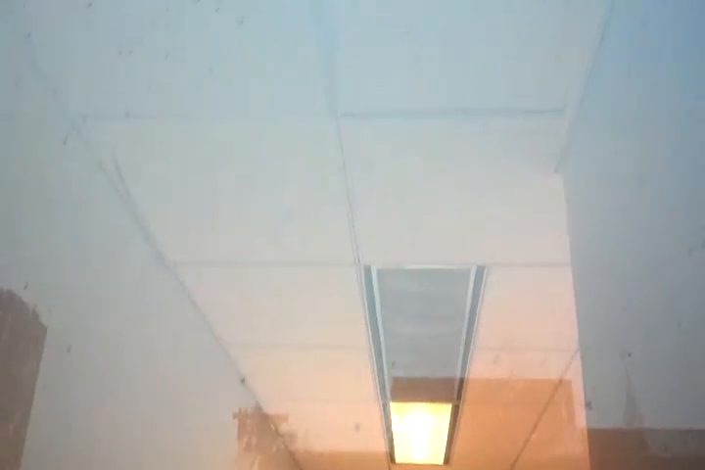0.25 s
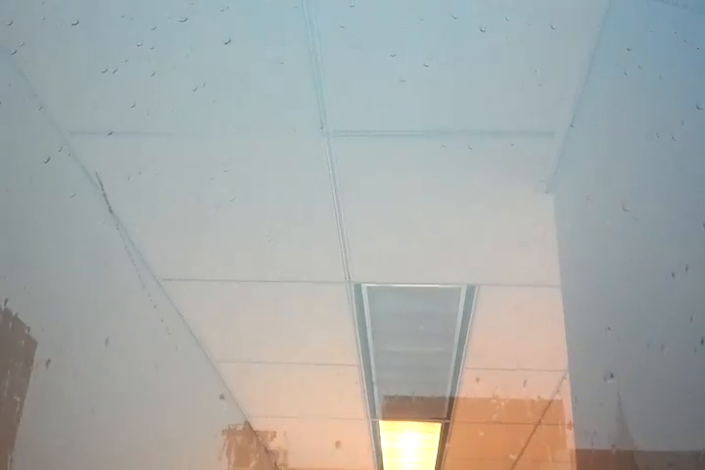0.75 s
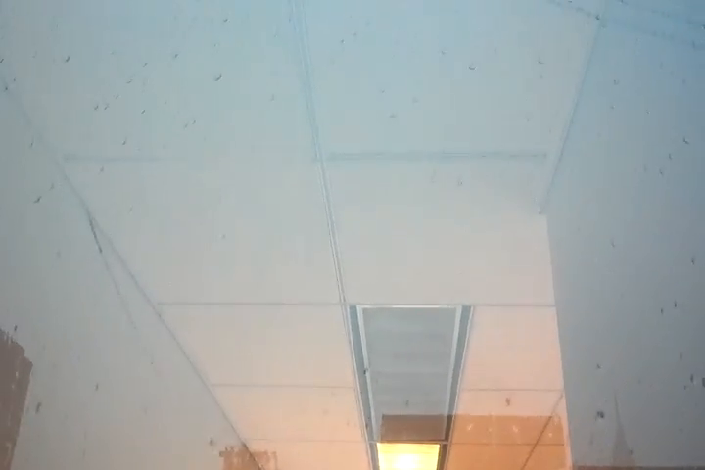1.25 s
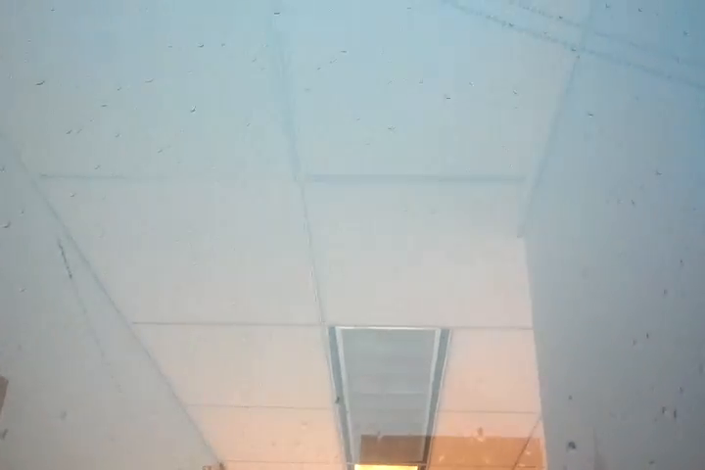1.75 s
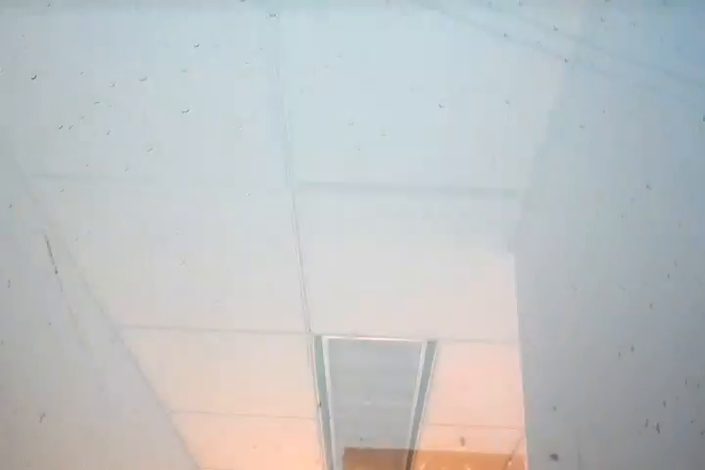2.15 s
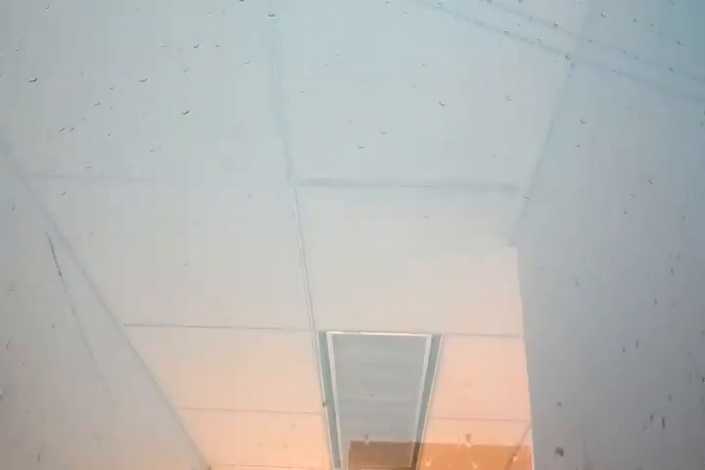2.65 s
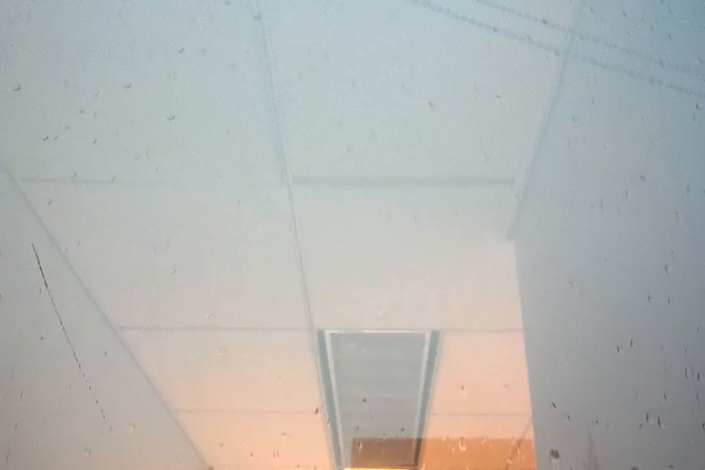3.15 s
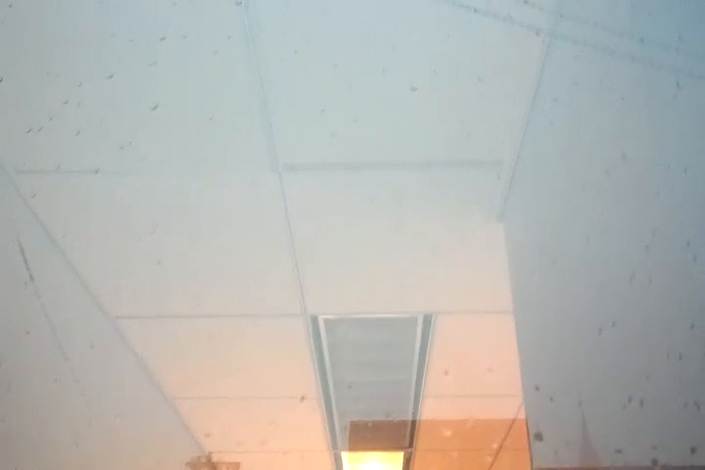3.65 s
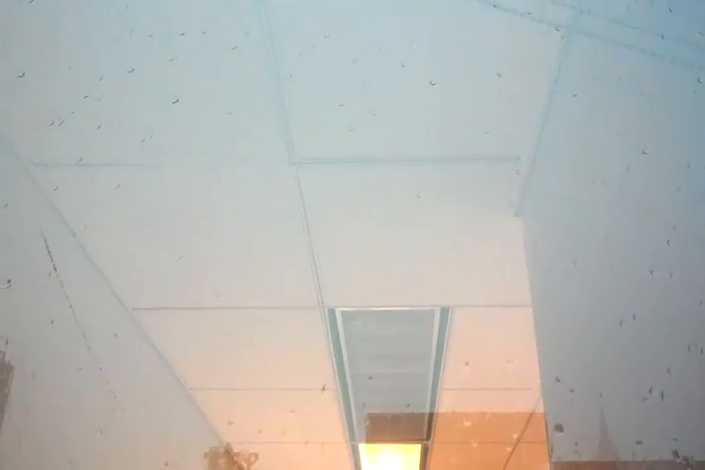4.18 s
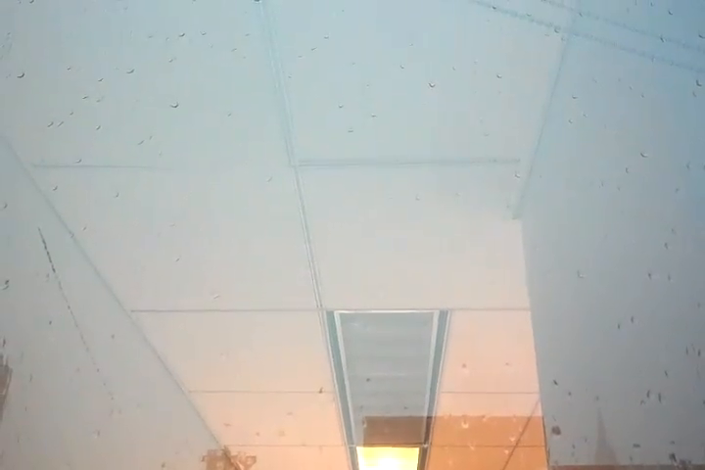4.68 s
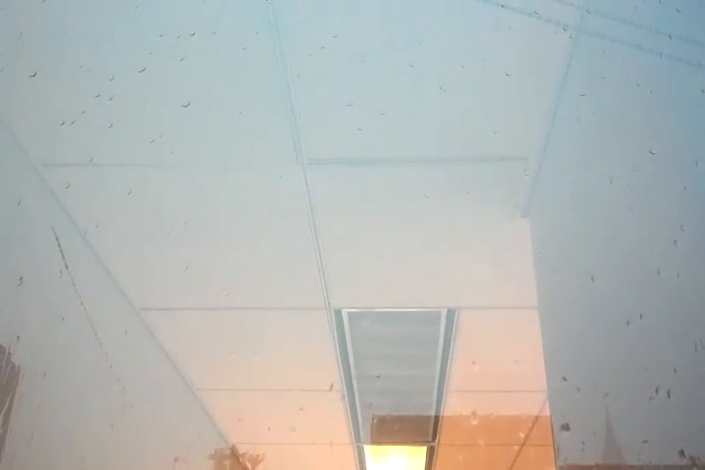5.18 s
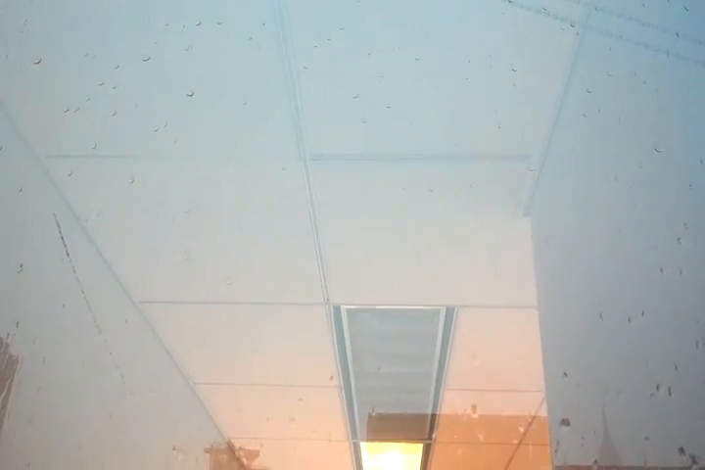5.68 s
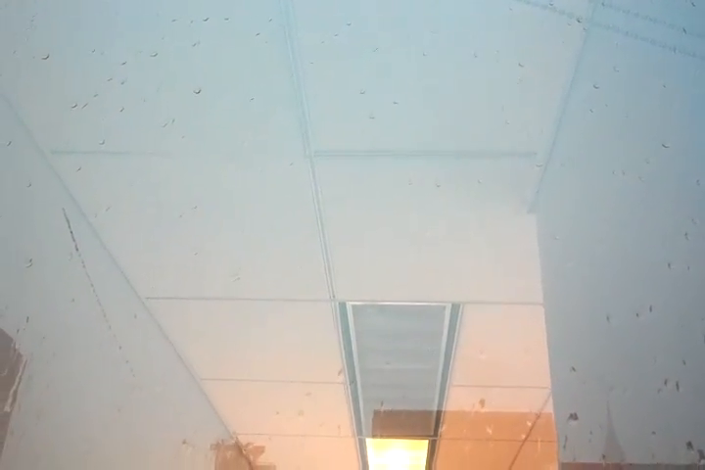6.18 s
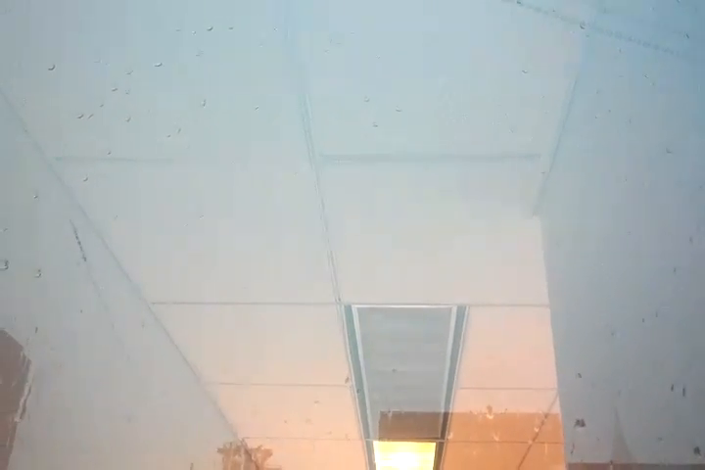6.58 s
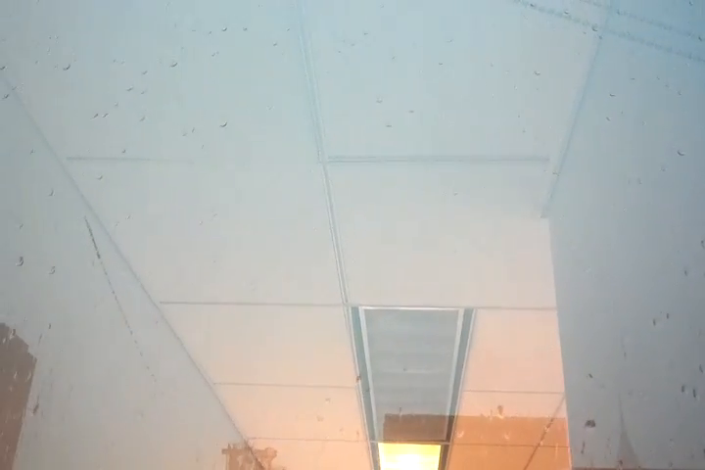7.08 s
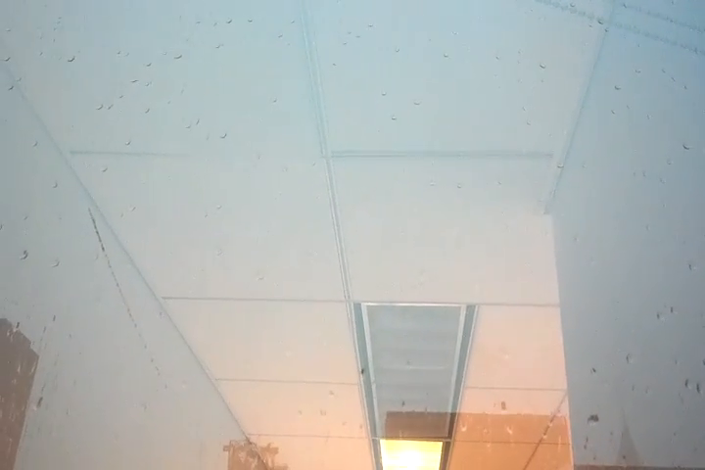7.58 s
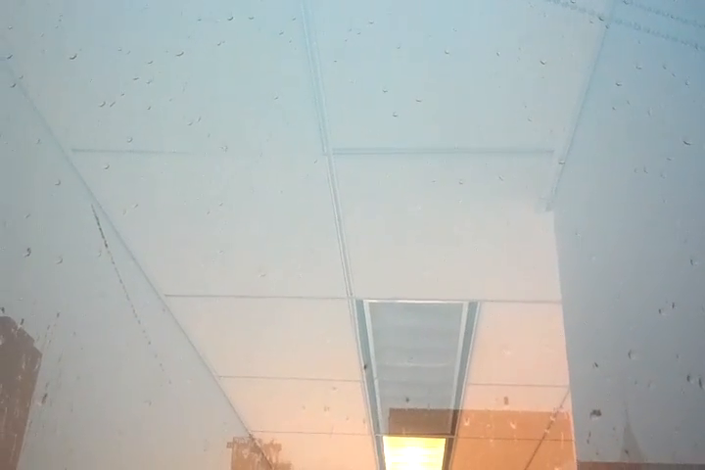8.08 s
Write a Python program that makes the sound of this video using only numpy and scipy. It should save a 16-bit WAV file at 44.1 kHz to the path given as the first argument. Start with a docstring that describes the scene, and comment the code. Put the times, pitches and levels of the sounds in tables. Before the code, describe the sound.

Indoors behind a closed window, a heavy downpour rushes without pause over a low rumble that booms in the pane. A sharp pop near the start suddenly drops the level, and the storm swells back over nearly three seconds. Fat drops tap and fine drops tick on glass and sill. Wide stereo, with the low boom leaning right.

```python
"""Indoors at night behind a closed window: a downpour rushes steadily over a low rumble that booms in the pane.
Filtered noise makes the rush, hiss and rumble; fat drops and fine patter are noise bursts ringing glass and sill.
Gusts and deep surges swell the storm. Two microphone ports are combined into a wide stereo pair.
A sharp pop near the start slams the gain control down; the storm takes nearly three seconds to swell back."""
import sys
import numpy as np
from scipy import signal
from scipy.fft import rfft, irfft, next_fast_len
from scipy.io import wavfile
from scipy.ndimage import uniform_filter1d

SR = 44100
rng = np.random.default_rng(int(sys.argv[2]) if len(sys.argv) > 2 else 0)


def dump(signal):
    """Clip the signal to [-1, 1] and save it as 16-bit WAV at the path in sys.argv[1]."""
    limited = np.clip(np.atleast_2d(signal).T, -1, 1)
    pcm = np.round(limited * 32767).astype(np.int16)
    wavfile.write(sys.argv[1], SR, pcm)


N = 367284

# Storm roar spectrum. Each row: frequency in Hz, density in dB per Hz before the level settings.
ROAR_SPECTRUM = [(20, -37), (45, -86), (70, -53.5), (100, -51), (145, -58.5), (250, -61), (400, -70.5),
                 (1000, -100), (4000, -130)]
# Bending modes of the pane. Each row: centre in Hz, width of one filter pass in Hz (two are used), relative level in dB.
PANE_MODES = [(109, 6, 5), (132, 12, -1), (183, 22, 2.5), (195, 34, 3), (272, 20, -8), (326, 16, -5),
              (350, 16, -5), (464, 18, -7), (515, 18, -14.5), (622, 24, -9.5), (645, 26, -12),
              (708, 26, -14.5), (803, 32, -12.5), (928, 36, -16.5), (1165, 80, -20.5), (1527, 30, -19),
              (1792, 60, -19), (1991, 20, -13.5)]
# Gusts. Each row: peak in seconds, release in seconds, rise of the rumble in dB, rise of the rush in dB.
GUST_EVENTS = [(0.05, 0.08, 4, 6), (1.93, 0.63, 6, 1.4), (3.0, 0.41, 2.8, 1.6), (4.351, 0.4, -2, 1.7),
               (5.85, 0.26, 0.5, 0.9), (6.45, 0.99, 0, 0.67), (7.95, 0.18, -1.5, 1.7)]
# Deep surges. Each row: middle in seconds, half length in seconds, density in dB per Hz ahead of the band filter.
SURGE_EVENTS = [(2.05, 0.14, -45.5), (5.054, 0.33, -51.5), (6.537, 0.19, -46), (7.38, 0.29, -47.5)]
# Rain behind the glass. Each row: frequency in Hz, density in dB per Hz before the swell.
RUSH_SPECTRUM = [(60, -94), (200, -61), (400, -74.5), (700, -76), (1000, -79), (1400, -80), (2000, -77.5),
                 (2350, -78), (2650, -81), (3100, -81), (3600, -86), (4400, -91.5), (7700, -99),
                 (16000, -108)]
# Even hiss on top. Each row: frequency in Hz, density in dB per Hz before the swell.
HISS_SPECTRUM = [(1000, -95), (4300, -90), (5100, -86.8), (6000, -86), (6900, -89), (7700, -90),
                 (9000, -89), (11000, -90), (13400, -85), (14200, -85.5), (15300, -80.5)]
# Modes a drop rings in glass and sill. Each row: centre in Hz, width in Hz, relative level in dB.
DROP_MODES = [(1160, 240, -7), (1530, 160, -4), (1780, 100, 2), (1991, 36, 6), (2220, 160, 2),
              (2400, 160, -1), (2650, 110, 0), (2850, 130, 1), (3080, 220, 2.5), (3520, 450, -3),
              (4180, 450, -5.5), (8000, 8000, -22)]
# Fat drops on the window. Each row: start in seconds, level in dB per Hz before the mode levels, brightness in dB.
FAT_DROPS = [(0.68, -83, 1), (0.77, -72.5, -1), (0.921, -75, 1.5), (1.014, -78, 4), (1.067, -74, -5),
             (1.097, -73, -15), (1.305, -67.5, -6), (1.369, -67, -11), (1.402, -68, -9), (1.642, -81, 4),
             (1.677, -80, -3), (1.761, -68.5, -4.5), (1.848, -69, -5), (1.928, -65.5, -1.5),
             (1.976, -82, 5), (2.087, -64.5, -4), (2.368, -68, -7.5), (2.484, -73, -6), (2.762, -74.5, -7),
             (2.809, -69.5, -21), (2.904, -68, -3), (3.006, -71, 1), (3.098, -69.5, -16), (3.23, -75, -6),
             (3.247, -69, -18), (3.284, -76, -7), (3.612, -74.5, -8), (3.656, -71, -6), (3.758, -72, -8),
             (3.839, -77, 0), (4.056, -74.5, 2), (4.125, -69, -18), (4.344, -64, -15), (4.589, -72, -3),
             (4.644, -78.5, 0), (5.508, -67.5, -6), (5.58, -70, -7), (5.614, -68, -6), (5.643, -70, -8),
             (5.832, -84, 4), (5.869, -65, -33), (5.978, -65.5, -14), (6.323, -72, -10), (6.341, -73, 5),
             (6.391, -71, -5), (6.464, -69, 1), (6.592, -75, -0.5), (6.638, -82, 1), (6.745, -73, -14),
             (6.953, -72, -20), (7.761, -79, 2), (7.863, -75, 0), (7.99, -66.5, -1), (8.181, -69, -7),
             (8.224, -68, -10)]
# Colour of the left port against the right. Each row: frequency in Hz, level difference in dB.
PORT_DIFFERENCE = [(200, -1.2), (600, -1.2), (1300, -3), (2000, -5), (3200, 0), (5000, 2), (7000, 0),
                   (10500, 0), (12500, -6), (16000, -6)]

GUST_ATTACK_S = 0.17
RUMBLE_DB, RUMBLE_EASING_DB_PER_S = -1.43, 0.34
RUMBLE_WAVER_DB, PANE_WAVER_DB = 0.07, 1.8  # wind
RUSH_DB = -1.5  # between gusts
SURGE_HZ, SURGE_PASS_WIDTH_HZ = 103, 41
DROP_ATTACK_S, SPOT_SCATTER_DB = 0.002, 1.6
SPRAY_S, SPRAY_DB_PER_HZ, SPRAY_DECAY_S = 2.087, -78.5, 0.022
SPRAY_HZ, SPRAY_WIDTH_HZ = 10400, 8700
POP_S, POP_DB, POP_DECAY_S = 0.1603, 21.2, 0.00045
PORT_LAG_SAMPLES = 16
TOP_HZ = 15760

SIZE = next_fast_len(N + 8192)  # padded FFT length
HZ = np.maximum(np.arange(SIZE // 2 + 1) * SR / SIZE, 1)
T = np.arange(N) / SR


def undb(db):
    """Decibels to gain."""
    return 10 ** (np.asarray(db) / 20)


def noise():
    """Two unrelated white noises at 0 dB per Hz."""
    return rng.standard_normal((2, N)) * np.sqrt(SR / 2)


def filtered(x, response):
    """Apply a frequency response."""
    return irfft(rfft(x, SIZE) * response, SIZE)[..., :N]


def colour(points):
    """Response through (Hz, dB) points, straight lines over log frequency."""
    hz, db = np.transpose(points)
    return undb(np.interp(np.log(HZ), np.log(hz), db))


def resonance(hz, width_hz):
    """Response of one damped mode, gain 1 at its centre."""
    return 1 / (1 + 1j * (HZ / hz - hz / HZ) * hz / width_hz)


def walk(rate_hz):
    """Random levels held 1 / rate_hz and smoothed twice; spread near 1."""
    hold = int(SR / rate_hz)
    held = np.repeat(rng.standard_normal(N // hold + 1), hold)
    smooth = uniform_filter1d(uniform_filter1d(held, hold), hold)
    return 1.3 * smooth[:N]


def diffuse(pair):
    """Sound from all round the room: alike at both ports in the bass, unrelated in the treble."""
    alike = np.sinc(2 * HZ * PORT_LAG_SAMPLES / SR)
    mid, side = filtered(pair, np.sqrt(np.array([1 + alike, 1 - alike]) / 2))
    return np.array([mid + side, mid - side])


def direct(x, bearing):
    """Sound from one direction (-1 left, 1 right) reaches the nearer port first."""
    lead_s = np.array([[-1], [1]]) * np.clip(bearing, -1, 1) * PORT_LAG_SAMPLES / SR / 2
    return filtered(x, np.exp(2j * np.pi * HZ * lead_s))


def gusts():
    """Changes of rumble and rush in dB: each gust builds quickly and dies away exponentially."""
    rise_db = np.zeros((2, N))
    for peak_s, release_s, rumble_db, rush_db in GUST_EVENTS:
        attack = (np.minimum(T - peak_s, 0) / GUST_ATTACK_S) ** 2
        release = np.maximum(T - peak_s, 0) / release_s
        rise_db += np.outer([rumble_db, rush_db], np.exp(-attack - release))
    return rise_db


def rumble(rumble_db, rush_db, pane_db, room_db, bearing):
    """The roar leaks in and shakes the pane: low modes boom from the right, all modes fill the room."""
    roar = filtered(noise(), colour(ROAR_SPECTRUM)) * undb(rumble_db - 1.0)
    leak = filtered(noise()[0], colour(ROAR_SPECTRUM)) * undb(rumble_db - 2.5)  # straight from the window
    modes = sum(undb(pane_db + db) * resonance(hz, width_hz) ** 2 for hz, width_hz, db in PANE_MODES)
    low = 1 / (1 + (HZ / 300) ** 4)  # roar drives the low modes, rain the higher ones
    boom = filtered(noise()[0] * undb(rumble_db + PANE_WAVER_DB * walk(9)), modes * low)
    push = noise() * undb(room_db)
    room_low = filtered(push * undb(rumble_db), modes * low)
    room_high = filtered(push * undb(rush_db), modes * (1 - low))
    return direct(boom + leak, bearing) + diffuse(roar + room_low + room_high)


def surges(bearing, room_db):
    """Now and then the deepest part of the roar swells and sinks: noise in one narrow band."""
    swell = sum(undb(db) * np.exp(-((T - s) / half_s) ** 2 / 2) for s, half_s, db in SURGE_EVENTS)
    band = resonance(SURGE_HZ, SURGE_PASS_WIDTH_HZ) ** 2
    window = direct(filtered(noise()[0] * swell, band), bearing)
    room = diffuse(filtered(noise() * swell, band)) * undb(room_db)
    return window + room


def rain(rush_db, flutter_db):
    """Far drops merge into a rush that flutters as sheets of rain go by; the hiss swells less."""
    swell_db = rush_db + flutter_db * walk(14)
    rush = filtered(noise(), colour(RUSH_SPECTRUM)) * undb(swell_db)
    hiss = filtered(noise(), colour(HISS_SPECTRUM)) * undb(swell_db / 2)
    return diffuse(rush + hiss)


def patter(rush_db, level_db, scatter_db, count):
    """Small drops at random moments, louder when the rain swells; rows as for the fat drops."""
    when, softness, hardness = rng.random((count, 3)).T
    swell_db = 2 * rush_db[(when * N).astype(int)]
    drop_db = level_db + swell_db - scatter_db * softness
    return np.column_stack([when * N / SR, drop_db, 8 * hardness - 1.5])


def splats(rows, t60_s, grain_db):
    """Drops burst into droplets that ring glass and sill; brightness lifts high modes, each spot favours others."""
    power = np.zeros((len(DROP_MODES), N))
    hz, width_hz, mode_db = np.transpose(DROP_MODES)
    droplets = undb(grain_db * rng.standard_normal(N))  # a few far bigger than the rest
    grains = noise() * droplets / droplets.std()
    spots_db = SPOT_SCATTER_DB * rng.standard_normal((len(rows), len(DROP_MODES)))
    tilt = np.clip(np.log2(hz / 1900), 0, 1)
    for (s, db, bright_db), spot_db in zip(rows, spots_db):
        start = int(np.clip(s * SR, 0, N - 1))
        power[:, start] += undb(db + mode_db + spot_db + bright_db * tilt) ** 2
    fade = np.exp(-2 * np.log(1000) / (t60_s * SR))
    attack = np.exp(-1 / (DROP_ATTACK_S * SR))
    envelopes = np.sqrt(signal.lfilter([1 - attack], np.poly([fade, attack]), power + 1e-18))
    ringing = np.zeros((2, N))
    for k, envelope in enumerate(envelopes):
        mode = resonance(hz[k], width_hz[k]) * (-1) ** k  # alternate polarity
        ringing += filtered(grains * envelope, mode)
    return diffuse(ringing)


def spray():
    """One fat drop shatters into a brief, bright hiss: decaying noise in a wide band."""
    age_s = T - SPRAY_S
    envelope = undb(SPRAY_DB_PER_HZ) * (age_s >= 0) * np.exp(-np.abs(age_s) / SPRAY_DECAY_S)
    return diffuse(filtered(noise() * envelope, resonance(SPRAY_HZ, SPRAY_WIDTH_HZ)))


def pop():
    """A sharp pop at the left port: one negative pressure step with a very fast exponential decay."""
    age_s = T - POP_S
    pulse = (age_s >= 0) * undb(POP_DB) * np.exp(-np.abs(age_s) / POP_DECAY_S)
    return np.array([[-1], [0]]) * pulse


def scene():
    """Pressure at the two ports, coloured by port, plus the uncoloured pop."""
    rumble_rise_db, rush_rise_db = gusts()
    easing_db = RUMBLE_EASING_DB_PER_S * T
    rumble_db = RUMBLE_DB - easing_db + rumble_rise_db + RUMBLE_WAVER_DB * walk(8.8)
    rush_db = RUSH_DB + rush_rise_db
    fat = splats(FAT_DROPS, t60_s=0.13, grain_db=6.5)
    fine_drops = patter(rush_db, level_db=-82.5, scatter_db=6.5, count=220)
    fine = splats(fine_drops, t60_s=0.064, grain_db=5.0)
    rush = rain(rush_db, flutter_db=1.07)
    roar = rumble(rumble_db, rush_db, pane_db=-55.0, room_db=-1.0, bearing=0.61)
    deep = surges(bearing=0.93, room_db=-9.5)
    shade = colour(PORT_DIFFERENCE) ** np.array([[.5], [-.5]])  # what one port loses the other gains
    shade /= np.sqrt(np.mean(shade ** 2, axis=0))  # mean power kept
    return filtered(rush + roar + deep + fat + spray() + fine, shade) + pop()


def gain_control(x, ceiling_db, release_db_per_s):
    """Gain drops at once for a peak over the ceiling and creeps back at a steady rate in dB."""
    peak_db = 20 * np.log10(np.abs(x).max(axis=0) + 1e-9)
    over_db = np.maximum(peak_db - ceiling_db, 0)
    recovered_db = release_db_per_s * T
    return x * undb(recovered_db - np.maximum.accumulate(over_db + recovered_db))


def record(dry):
    """Gain control, then each port minus the delayed other: back-to-back cardioids; bottom and top cut."""
    ports = gain_control(dry, ceiling_db=-3.6, release_db_per_s=8.7)
    delayed_other = np.pad(ports[::-1], ((0, 0), (PORT_LAG_SAMPLES, 0)))[:, :N]
    pair = (ports - delayed_other) / np.sqrt(2)
    pair = signal.sosfilt(signal.butter(2, 55, "highpass", fs=SR, output="sos"), pair)
    return signal.sosfilt(signal.ellip(12, .2, 80, TOP_HZ, fs=SR, output="sos"), pair)


dry = scene()
out = record(dry)
dump(out)
```